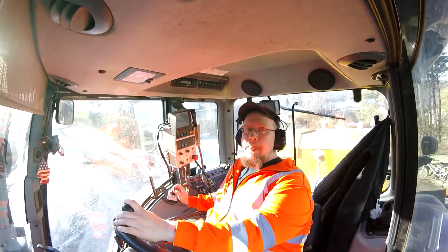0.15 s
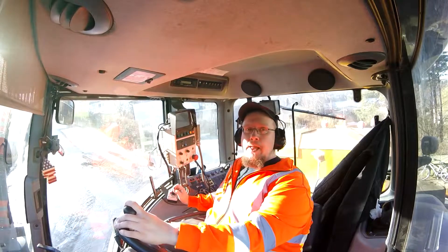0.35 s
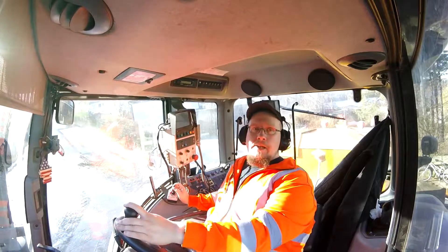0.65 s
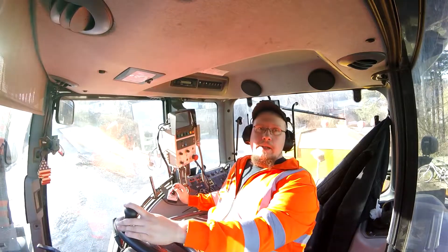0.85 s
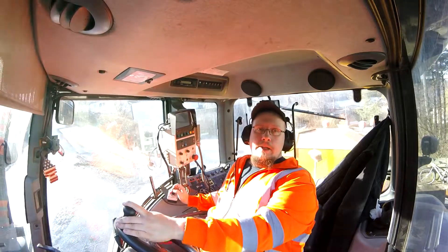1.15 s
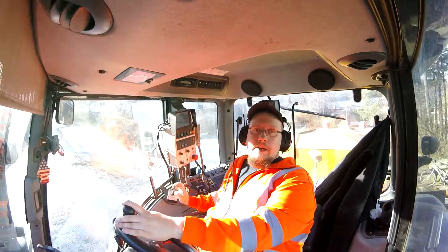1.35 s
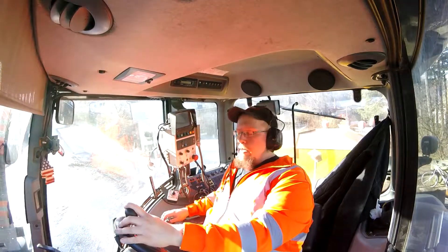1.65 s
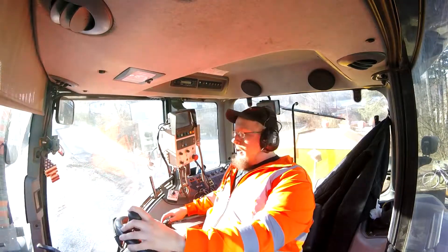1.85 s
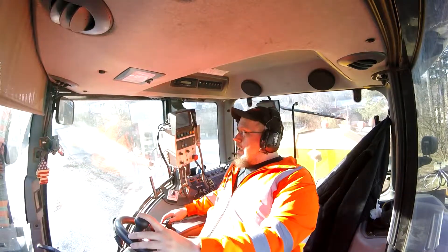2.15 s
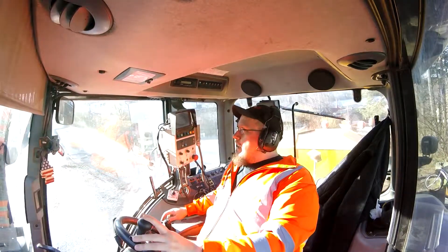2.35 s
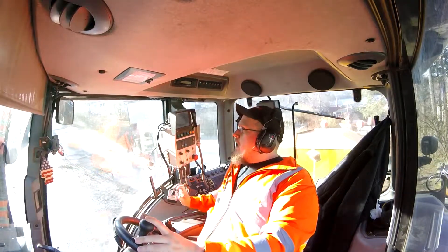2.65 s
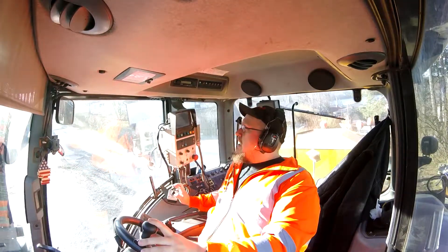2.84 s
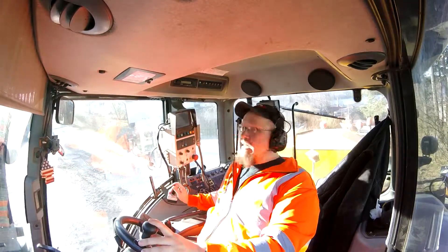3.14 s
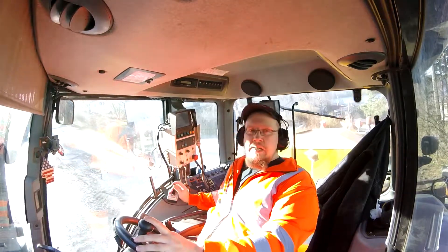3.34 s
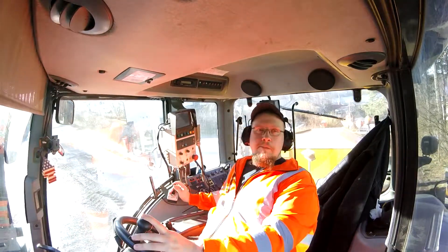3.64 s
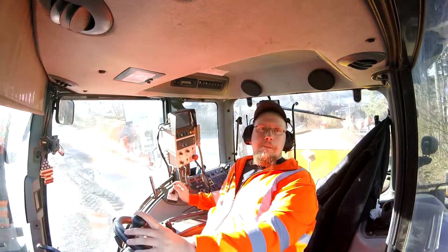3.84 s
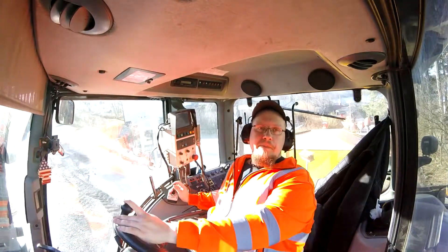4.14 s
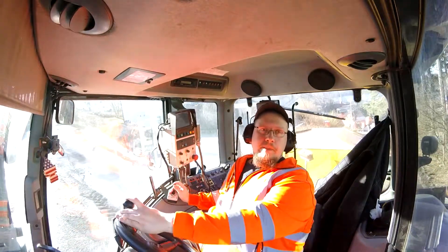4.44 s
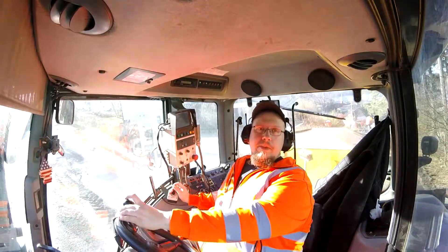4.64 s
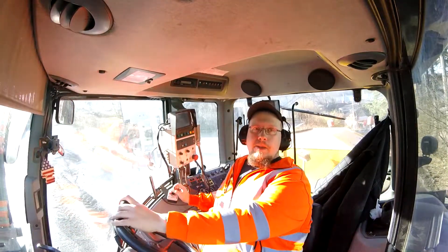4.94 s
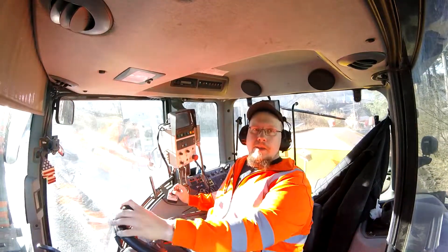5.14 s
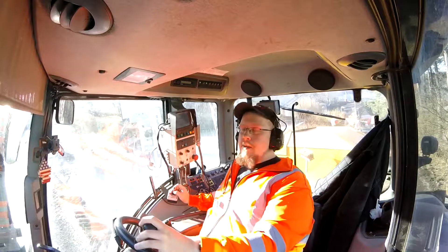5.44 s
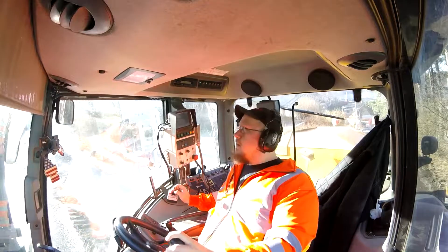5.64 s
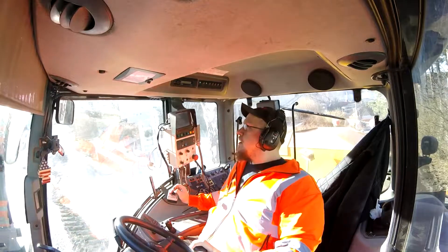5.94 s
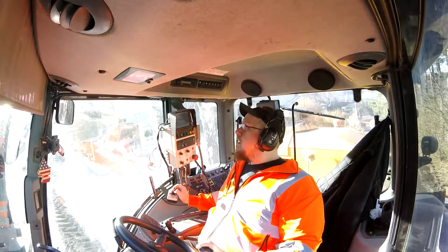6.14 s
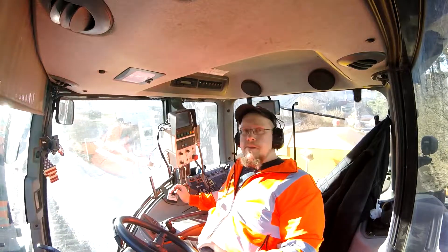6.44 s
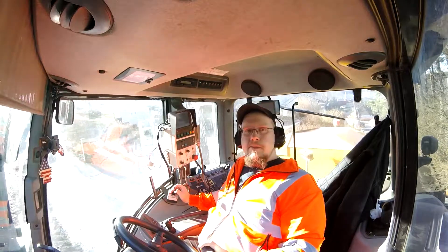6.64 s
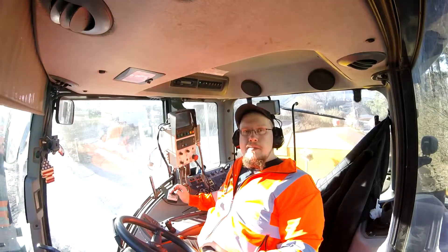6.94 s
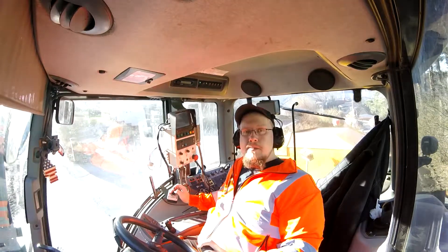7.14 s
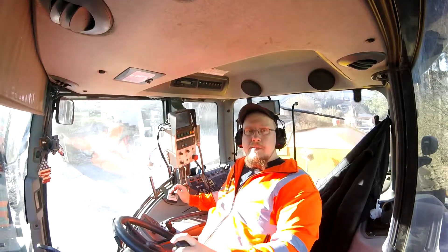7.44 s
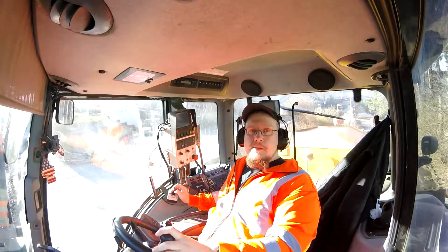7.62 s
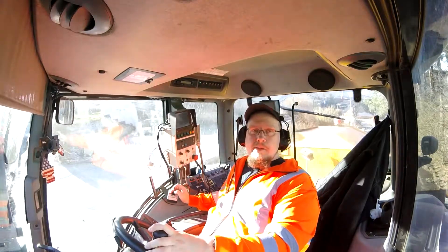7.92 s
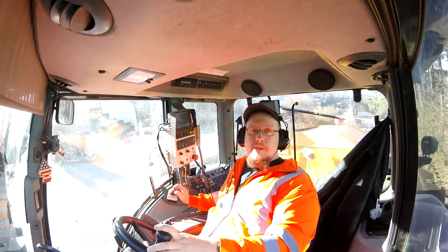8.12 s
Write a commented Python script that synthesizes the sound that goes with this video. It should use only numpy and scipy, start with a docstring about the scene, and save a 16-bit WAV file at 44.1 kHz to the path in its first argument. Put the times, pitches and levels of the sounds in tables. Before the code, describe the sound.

A diesel engine hums and rumbles through cab panels, with booming shakes, hard clustered knocks and a brief hydraulic hiss.

```python
"""Tractor cab on rough ground

One microphone inside the cab of a diesel tractor that drives steadily; the engine lies beyond panels and glass.
Sine tones make its drone, whines and the cab's boom; coloured noise makes its rumble and clatter.
On bumps a loose fitting in the cab chatters against its stop: each blow rings the modes of the shell and cracks.
The steering hydraulics hiss briefly as swelling noise. A limiter ducks for the knocks and recovers slowly;
its faint clicks before two bursts of knocks are short noise bursts placed at set times.
"""
import sys
import numpy as np
from scipy import signal
from scipy.fft import rfft, irfft
from scipy.io import wavfile
from scipy.ndimage import uniform_filter1d, minimum_filter1d

SR = 44100
rng = np.random.default_rng(int(sys.argv[2]) if len(sys.argv) > 2 else 0)


def int16_out(signal):
    """Quantize to a 16-bit WAV file."""
    q = np.round(np.clip(np.atleast_2d(signal).T, -1, 1) * 32767)
    wavfile.write(sys.argv[1], SR, q.astype(np.int16))


N = 365148
TIME = np.arange(N) / SR
DRONE_ORDER = 8  # cycles of the drone per turn of the crank


def undb(db):
    """Decibels to gain."""
    return 10 ** (np.asarray(db) / 20)


def noise():
    """White noise of unit level."""
    return rng.standard_normal(N)


def curves(table):
    """Each column of a time table, interpolated at every sample."""
    s, *columns = np.transpose(table)
    return [np.interp(TIME, s, column) for column in columns]


def shape(x, gain):
    """Apply a gain to each frequency bin."""
    return irfft(rfft(x) * gain, N)


def bin_hz():
    """Frequencies of the bins in Hz."""
    return np.arange(N // 2 + 1) * SR / N


def colour(x, spectrum):
    """Give unit white noise a spectrum of (Hz, dB per Hz) points, joined along log frequency."""
    hz, db = np.transpose(spectrum)
    level_db = np.interp(np.log(bin_hz() + 1), np.log(hz), db)
    return shape(x, undb(level_db)) * np.sqrt(SR / 2)


def walk(rate):
    """Random levels held 1 / rate s, then smoothed twice; spread near 1."""
    hold = max(int(SR / rate), 1)
    held = np.repeat(rng.standard_normal(N // hold + 1), hold)
    slewed = uniform_filter1d(uniform_filter1d(held, hold), hold)
    return 1.3 * slewed[:N]


def turns(hz):
    """Cycles completed at a moving rate, from a random start."""
    return np.cumsum(hz) / SR + rng.random()


def tone(cycles, db):
    """A sine of the given rms level."""
    return np.sqrt(2) * undb(db) * np.sin(2 * np.pi * cycles)


def cab_air(x, ripple_db=2.3, spacing_hz=22):
    """Reflections between the windows leave fine, fixed peaks and dips in the spectrum."""
    ripple = np.interp(bin_hz() / spacing_hz, np.arange(4096), rng.standard_normal(4096))
    return shape(x, undb(ripple_db * ripple))


# Engine speed and drone as heard in the cab.
# Each row: time in seconds, drone frequency in Hz, drone level in dB before trim and waver.
ENGINE_DRIVE = [(0.0, 280.3, -29), (0.6, 275.3, -28), (0.95, 267.8, -28), (1.2, 278.0, -34),
                (1.45, 282.2, -29), (2.7, 279.7, -28.5), (3.0, 271.3, -31), (3.25, 279.3, -25),
                (3.45, 279.8, -36.5), (3.85, 272.1, -36.5), (4.1, 269.2, -31), (4.65, 272.2, -27),
                (5.1, 283.6, -33), (5.9, 281.5, -28.7), (6.65, 282.3, -30), (7.0, 282.8, -27.5),
                (7.75, 280.9, -24.5), (8.28, 278.9, -30.5)]
# Engine orders beside the drone. Each row: multiple of the crank rate, level in dB before trim and waver.
ENGINE_ORDERS = [(2, -42), (3, -38), (4, -38.5), (5.5, -37.5), (10.5, -46.5), (13.5, -52), (16, -47.5)]
# Engine and running gear through the floor. Each row: frequency in Hz, level in dB per Hz before trim.
FLOOR_RUMBLE = [(10, -68), (24, -52), (40, -54), (55, -59), (80, -54), (107, -49), (122, -52), (145, -48),
                (168, -50), (188, -46.5), (235, -55), (340, -55), (600, -65), (1300, -84), (8000, -150)]
# Combustion and fan through the glass. Each row: frequency in Hz, level in dB per Hz before trim.
GLASS_CLATTER = [(300, -74), (700, -70), (1120, -71.5), (1500, -79.5), (2200, -79), (2850, -79),
                 (3300, -87), (4000, -95), (5900, -100), (6500, -92.5), (7100, -99), (8800, -104),
                 (10000, -114), (13000, -116)]


def engine(drone_hz, drone_db, rumble_trim_db=-1.03, clatter_trim_db=-0.95, drone_trim_db=-0.96,
           waver_db=3.5, phase_wander=0.12):
    """Crank orders, one of them a strong drone, over rumble and clatter that pulse with the firings."""
    crank = turns(drone_hz / DRONE_ORDER * (1 + .003 * walk(12)))
    drone_cycles = DRONE_ORDER * crank + .035 * walk(18)
    drone = tone(drone_cycles, drone_db + drone_trim_db + 2.1 * walk(12))
    orders = sum(tone(order * crank + phase_wander * walk(11), db + waver_db * walk(8))
                 for order, db in ENGINE_ORDERS)
    # four cylinders fire twice a turn, each a little differently
    firing = 1 + .11 * np.cos(2 * np.pi * 2 * crank) * undb(2.5 * walk(70))
    rumble = colour(noise() * firing, FLOOR_RUMBLE)
    clatter_source = cab_air(noise()) * firing * undb(.5 * walk(20))
    clatter = colour(clatter_source, GLASS_CLATTER)
    return drone + undb(rumble_trim_db) * (orders + rumble) + undb(clatter_trim_db) * clatter


# Pumps and gears. Each row: centre frequency in Hz, level in dB before trim and flicker.
PUMP_WHINES = [(1192, -52.5), (1261, -55.5), (1374, -58.5), (1625, -59.5), (1760, -60), (2247, -63.5),
               (2363, -59), (2535, -63.5)]


def whines(flicker_db=2.5, trim_db=-4.5, drift=.003):
    """Pumps and gears sing thin tones that drift in pitch and flicker in level."""
    return sum(tone(turns(hz * (1 + drift * walk(9))), db + trim_db + flicker_db * walk(3.15))
               for hz, db in PUMP_WHINES)


# Shaking of the cab, stronger on rough ground.
# Each row: time in seconds, boom level in dB before trim and waver.
CAB_SHAKE = [(0.0, -20.5), (0.5, -27), (0.8, -22), (1.05, -29.0), (1.38, -31.0), (1.6, -20), (2.45, -19),
             (3.05, -31), (3.65, -21.6), (4.95, -27.3), (5.25, -20.7), (5.7, -20), (6.05, -23.3),
             (6.65, -24.3), (7.05, -19.3), (7.5, -25.0), (8.28, -23.6)]


def boom(crank_hz, trim_db=-2.7, wander=.045, waver_db=1.5):
    """The whole cab shakes on its mounts, roughly once a turn of the crank."""
    shake_db, = curves(CAB_SHAKE)
    cycles = turns(crank_hz * (1 + wander * walk(12)))
    return tone(cycles, shake_db + trim_db + waver_db * walk(12))


def chatter(peak_s, peak_db, before, after, gap_s, drop_db, build_db=2.5, build_power=1.3,
            slowing=.097, rebound_db=3.5):
    """Times in s, levels and crack levels in dB of blows that build evenly, then die as their gaps grow."""
    k = np.arange(-round(before), round(after) + 1)  # 0 is the hardest blow
    # each gap after the hardest blow grows by the share "slowing"
    clock = np.cumsum(gap_s * (1 + slowing * np.maximum(k, 0)))
    build = build_db * np.abs(k) ** build_power
    decay = drop_db * k ** 2
    db = peak_db - np.where(k < 0, build, decay)
    # the first rebound lands with extra crack
    crack_db = db + rebound_db * (k == 1)
    return np.array([peak_s + clock - clock[k == 0], db, crack_db])


# Bumps that set the loose fitting chattering. Each row: time of the hardest blow in seconds,
# its strength in dB, blows before it, blows after it, gap between blows in seconds before any slowing,
# drop to the next blow in dB.
FITTING_BUMPS = [(0.0145, 4, 0, 2, 0.0257, 3.3), (0.7602, -0.6, 1, 1, 0.0242, 3.9),
                 (1.6275, 0.8, 1, 1, 0.0262, 7.1), (1.8468, 5.5, 2, 2, 0.0246, 2.7),
                 (1.9326, -2.1, 0, 2, 0.025, 0.5), (2.0452, -0.8, 1, 2, 0.0266, 1.7),
                 (2.1316, -0.9, 0, 0, 0, 0), (2.1827, 5.0, 1, 2, 0.0245, 2.3),
                 (2.2711, -1.0, 0, 2, 0.0262, 2.4), (2.41, 4.3, 2, 1, 0.0263, 4.6),
                 (2.4705, -2.9, 0, 2, 0.0276, 3.0), (2.643, -4.3, 0, 2, 0.0276, 3.8),
                 (3.6778, -2.0, 1, 1, 0.0271, 10.4), (5.391, 6.0, 2, 2, 0.0247, 2.9),
                 (5.7229, 4.7, 2, 1, 0.0238, 11.1), (5.8121, -1.2, 1, 1, 0.0289, 9.8),
                 (6.095, -6.1, 0, 0, 0, 0), (7.0448, 5.0, 2, 2, 0.0252, 2.6), (8.2347, -12.0, 0, 0, 0, 0)]
# Modes of the cab shell. Each row: frequency in Hz, 60 dB decay time in seconds,
# level in dB before trim and blow strength, polarity.
CAB_SHELL = [(36.5, 0.407, -25.7, 1), (60.0, 0.047, -7.9, 1), (139.6, 0.407, -21.1, -1),
             (229.5, 0.023, -3.9, -1), (280.6, 0.074, -4.1, -1), (294.4, 0.131, -8.7, 1),
             (329.1, 0.127, -12.3, -1), (340.2, 0.05, -6.5, 1), (442.4, 0.035, -12.3, -1),
             (562.9, 0.043, -27.1, 1), (626.9, 0.098, -29.4, -1), (666.7, 0.012, -14.4, 1)]
# Contact noise of a blow. Each row: frequency in Hz, level in dB per Hz before trim and blow strength.
CONTACT_CRACK = [(300, -56.5), (700, -55), (950, -55), (1300, -61), (1650, -69), (2000, -64), (2600, -73),
                 (3600, -85), (4400, -85), (5000, -80), (5900, -87), (7000, -91.5), (12000, -115)]


def knocks(crack_trim_db=-1.0, crack_s=0.0013, tail=0.065, tail_s=.02, push_s=.00005, ring_trim_db=0.5):
    """Every blow of the fitting rings the same shell modes; harder ones add more contact noise."""
    s, db, contact_db = np.hstack([chatter(*bump) for bump in FITTING_BUMPS])
    at = np.round(np.maximum(s, 0) * SR).astype(int)
    blows = np.bincount(at, undb(db), N)
    t = TIME[:SR // 2]
    ring = sum(sign * undb(mode_db - 60 * t / t60) * np.sin(2 * np.pi * hz * t)
               for hz, t60, mode_db, sign in CAB_SHELL)
    # the padded stop spreads each push in time
    push = np.exp(-t / push_s)
    ring = signal.fftconvolve(ring, push / push.sum())[:len(t)]
    thump = signal.fftconvolve(blows, ring)[:N]
    # hard blows press through the padding, so the crack grows faster than the thump
    hardness = np.bincount(at, undb(contact_db), N) ** 1.1
    fade = np.exp(-t / crack_s) + tail * np.exp(-t / tail_s)
    contact = signal.fftconvolve(hardness, fade)[:N]
    crack = colour(contact * noise(), CONTACT_CRACK)
    return undb(ring_trim_db) * thump + undb(crack_trim_db) * crack


# Surges of oil through the steering valve.
# Each row: time of the peak in seconds, level in dB before flutter, fade in dB per second.
OIL_SURGES = [(2.57, 1, 95), (2.76, -8, 45), (3.52, -15, 60)]
# Colour of the oil hiss. Each row: frequency in Hz, level in dB per Hz before surge and flutter.
OIL_HISS = [(2000, -110), (3600, -82), (4300, -87.5), (4750, -80.5), (5150, -77), (5650, -83),
            (6500, -85.5), (8000, -97.5), (11000, -108), (15000, -125)]


def steering(flutter_db=2.0, open_db_per_s=115):
    """Oil hisses through the steering valve; each surge swells quickly and fades more slowly."""
    power = 0
    for s, db, fade_db_per_s in OIL_SURGES:
        below_peak_db = np.maximum(open_db_per_s * (s - TIME), fade_db_per_s * (TIME - s))
        power = power + undb(db - below_peak_db) ** 2
    return colour(noise(), OIL_HISS) * np.sqrt(power) * undb(flutter_db * walk(25))


# Faint clicks of the limiter as it ducks before two bursts of knocks.
# Each row: start in seconds, level in dB.
LIMITER_CLICKS = [(5.322, -5), (6.9826, -9.5)]
# Colour of the clicks. Each row: frequency in Hz, level in dB per Hz before each click's level.
CLICK_COLOUR = [(1000, -72), (3500, -64), (6000, -69), (9000, -87), (13000, -82)]


def limiter_clicks(decay_s=0.00069):
    """Abrupt gain drops click: here, bright noise at set times that starts at once and dies exponentially."""
    burst = sum(undb(db) * (TIME >= s) * np.exp(-np.abs(TIME - s) / decay_s) for s, db in LIMITER_CLICKS)
    return colour(burst * noise(), CLICK_COLOUR)


def scene():
    """Sounds in the cab at one microphone, plus the limiter's clicks."""
    drone_hz, drone_db = curves(ENGINE_DRIVE)
    motor = engine(drone_hz, drone_db) + whines()
    cab = boom(drone_hz / DRONE_ORDER) + knocks()
    return (motor + cab + steering() + limiter_clicks())[None]


def record(dry, ceiling_db=-3.0, ahead_s=0.043, attack_s=.006, release_db_per_s=2.5, start_db=-5.0,
           top_hz=13800):
    """A look-ahead limiter, already start_db down, ducks before each loud peak and creeps back; the top is cut."""
    room_db = np.minimum(ceiling_db - 20 * np.log10(np.abs(dry[0]) + 1e-9), 0)
    # least headroom from now to ahead_s later
    span = int(ahead_s * SR / 2)
    coming_db = minimum_filter1d(room_db, 2 * span + 1, origin=-span)
    # the gain may rise no faster than the recovery
    recovery_db = release_db_per_s * TIME
    held_db = np.minimum.accumulate(np.minimum(coming_db - recovery_db, start_db))
    gain = undb(uniform_filter1d(held_db + recovery_db, int(attack_s * SR) + 1))
    low_pass = signal.ellip(8, .2, 70, top_hz, fs=SR, output="sos")
    return signal.sosfilt(low_pass, dry * gain)


dry = scene()
out = record(dry)
int16_out(out)
```